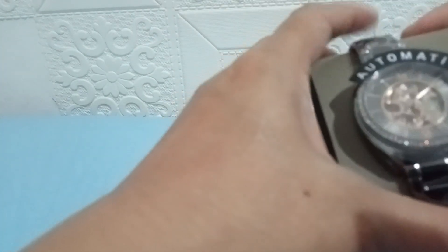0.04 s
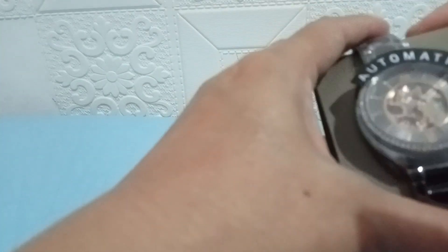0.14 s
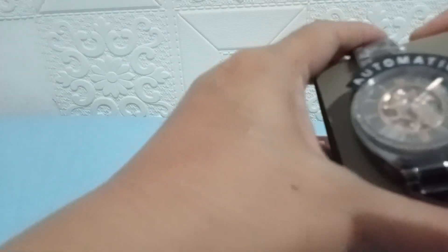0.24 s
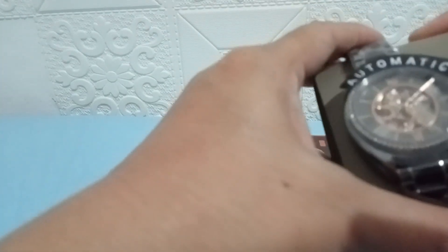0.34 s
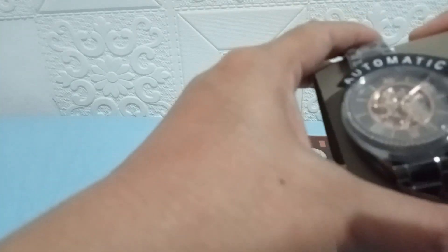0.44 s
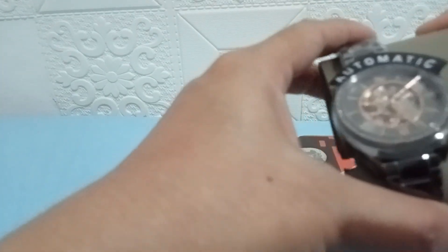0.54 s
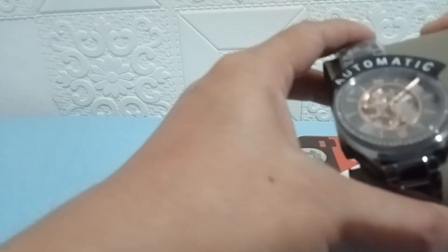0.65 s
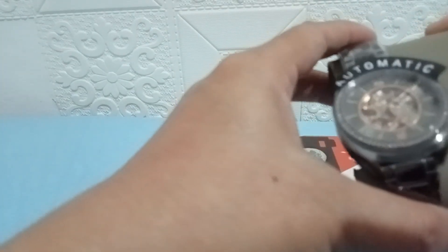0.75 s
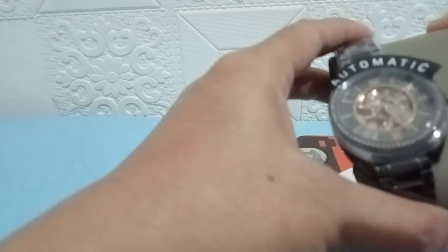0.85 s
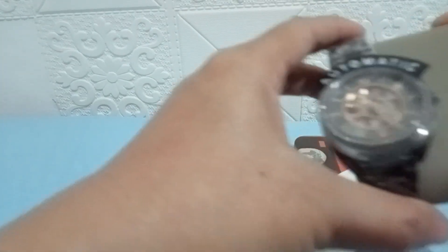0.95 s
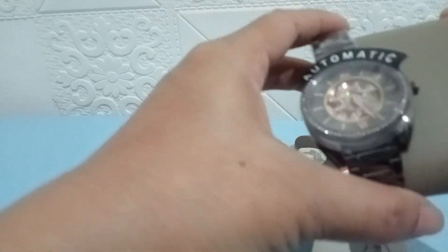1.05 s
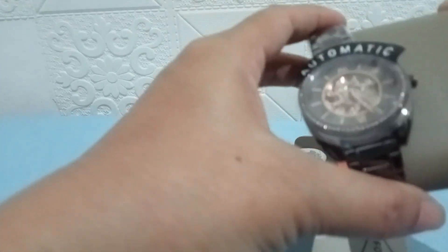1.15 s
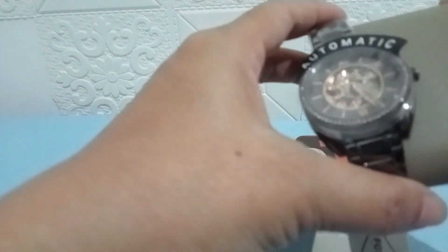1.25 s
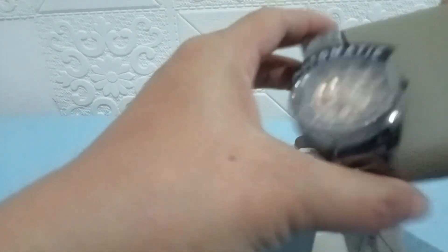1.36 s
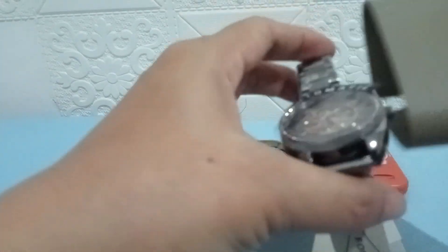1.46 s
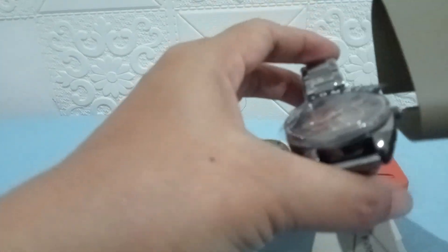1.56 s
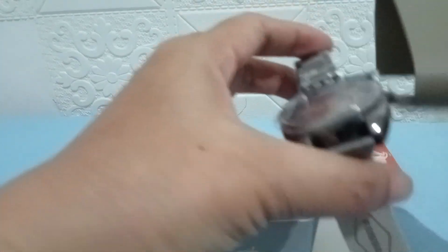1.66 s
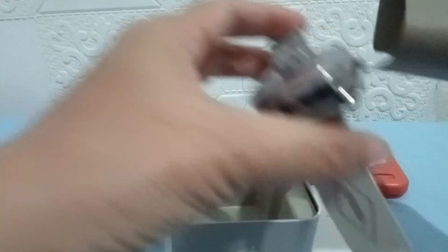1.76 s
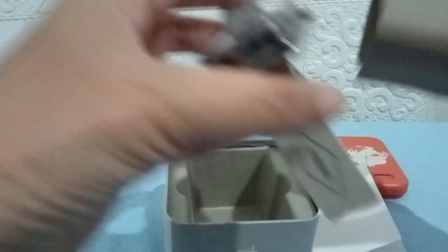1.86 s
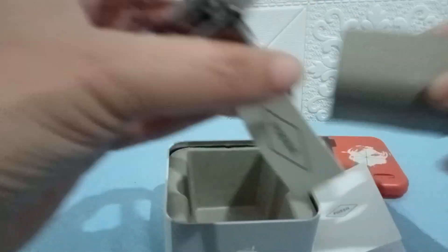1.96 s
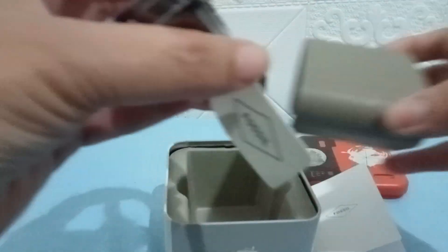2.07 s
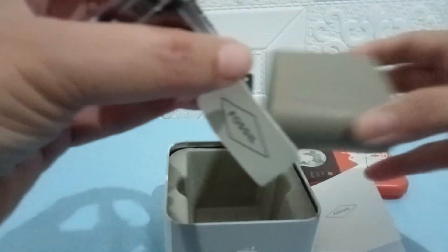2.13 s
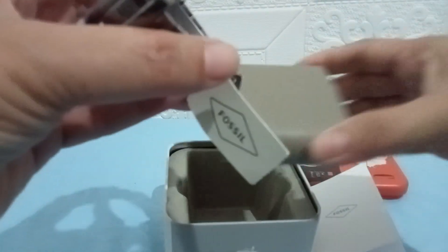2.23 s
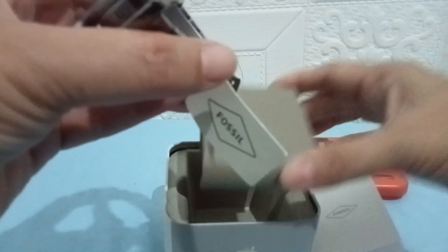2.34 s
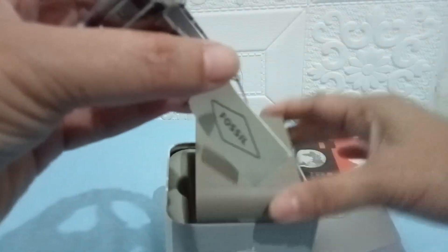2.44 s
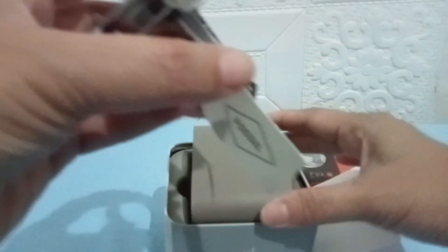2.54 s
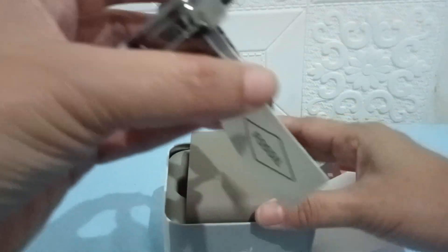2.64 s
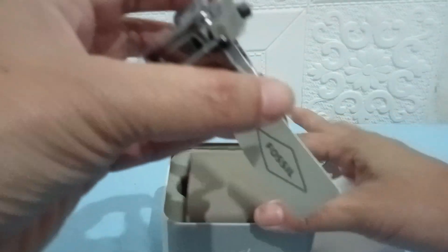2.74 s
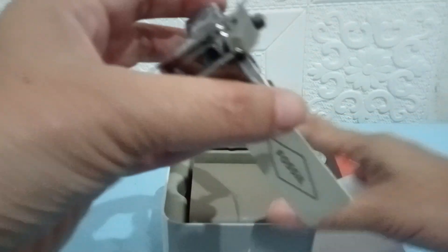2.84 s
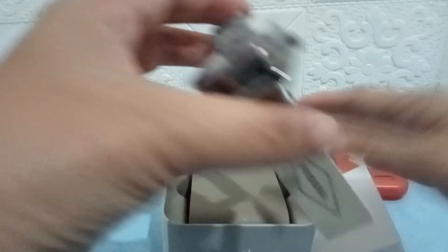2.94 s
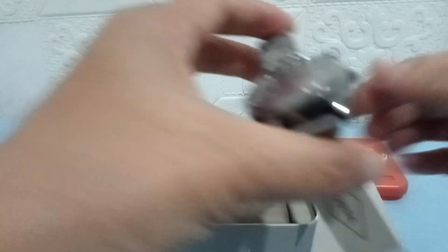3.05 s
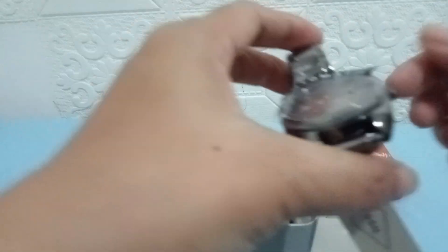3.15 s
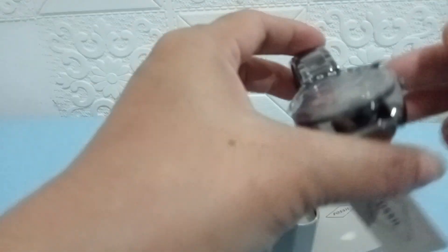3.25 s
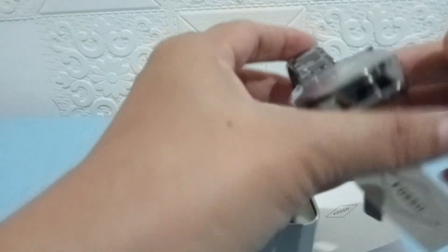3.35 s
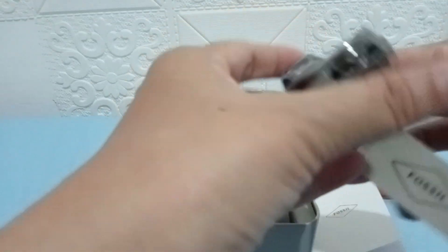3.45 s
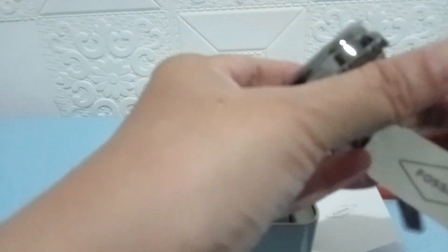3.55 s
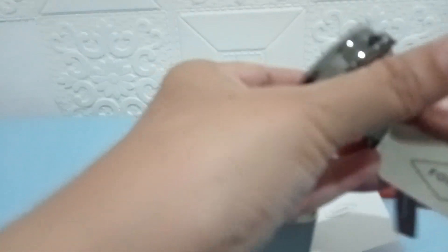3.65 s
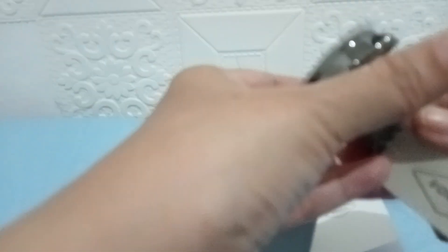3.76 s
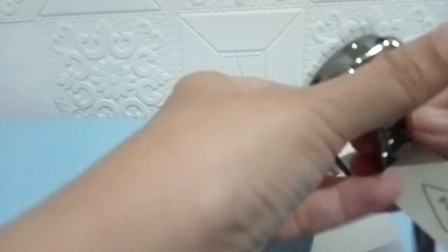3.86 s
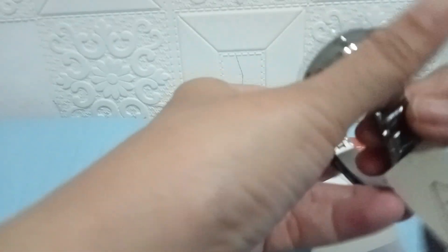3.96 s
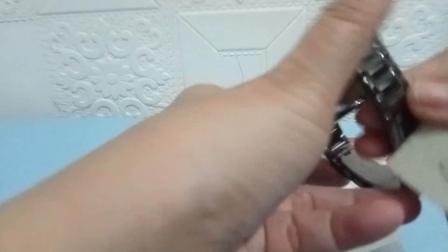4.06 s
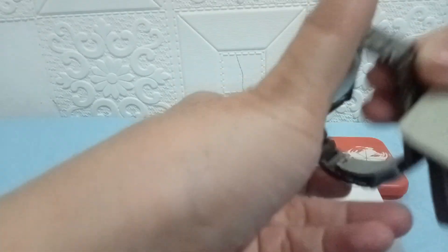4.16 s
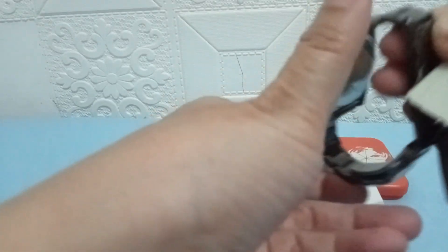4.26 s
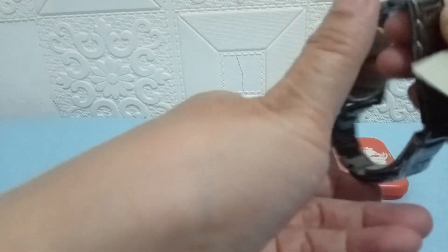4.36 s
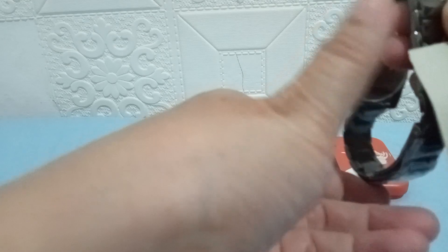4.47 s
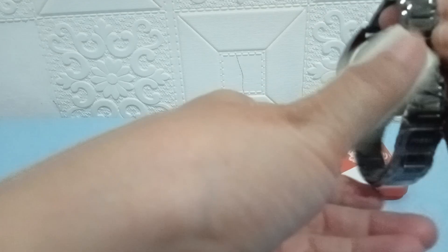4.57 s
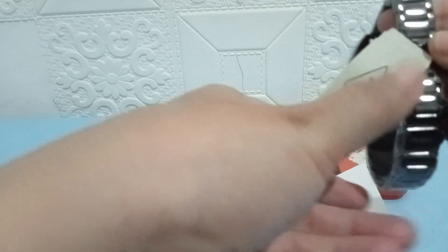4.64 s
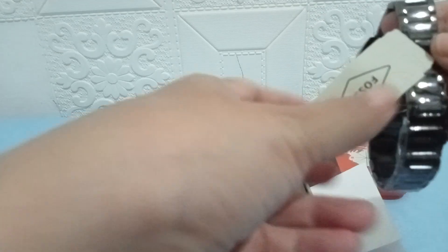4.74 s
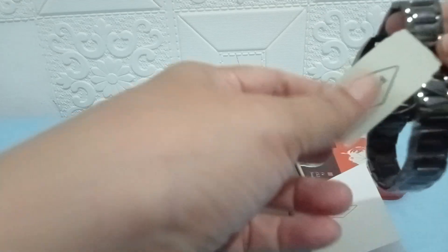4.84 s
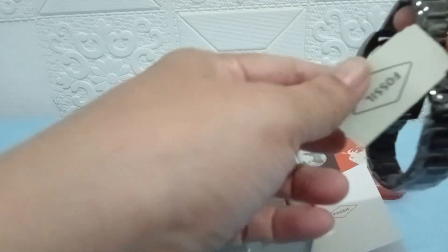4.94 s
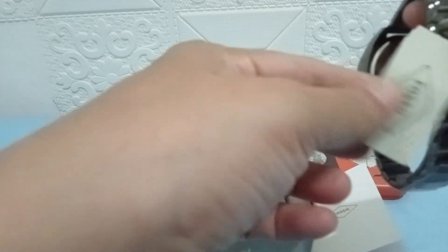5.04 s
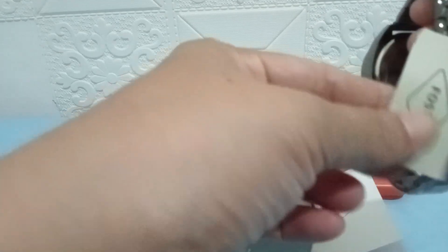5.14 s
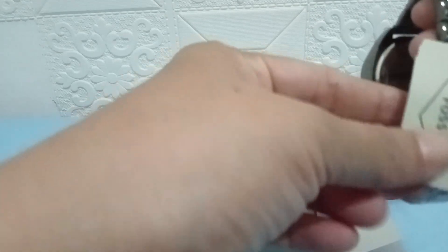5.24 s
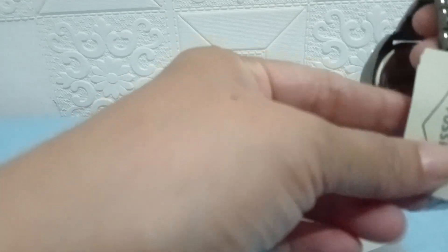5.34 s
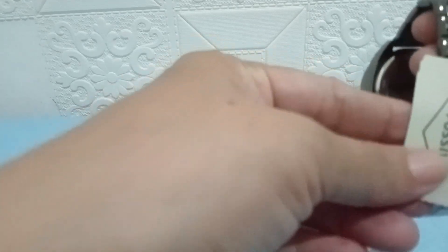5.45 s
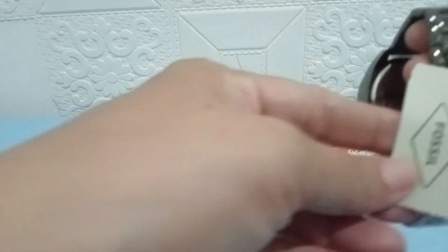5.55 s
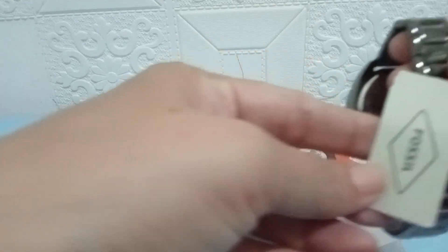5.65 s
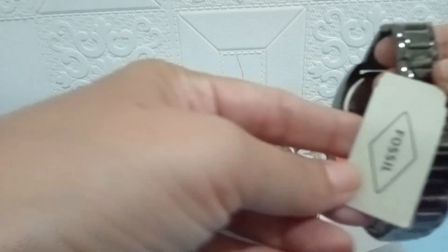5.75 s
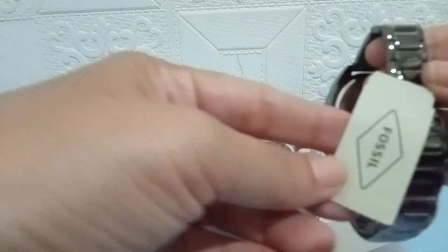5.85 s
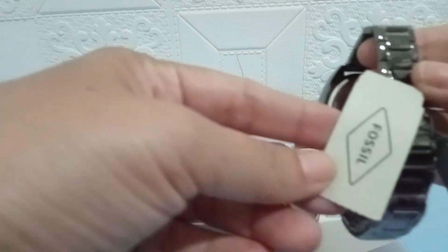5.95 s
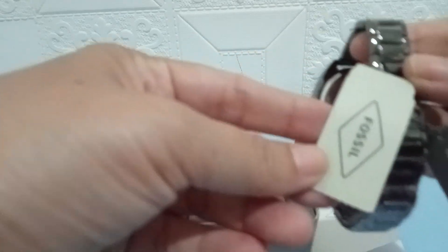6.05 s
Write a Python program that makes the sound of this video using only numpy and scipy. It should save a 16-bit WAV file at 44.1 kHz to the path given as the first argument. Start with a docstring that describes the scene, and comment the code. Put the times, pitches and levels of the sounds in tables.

```python
"""Small room, close microphone: a steel watch is slid off its cushion; the links rub, tick and clink.
Then the cushion is dropped and pushed back into its tin, whose damped modes ring under padded knocks.
Last the folding clasp snaps open and flips over: two hard blows on small resonant parts.
Throughout, fingers and a card tag brush the steel as filtered friction noise.
The hands rumble faintly over room air and a low steady hum."""
import sys
import numpy as np
from scipy import signal
from scipy.fft import rfft, irfft, next_fast_len
from scipy.io import wavfile

SR = 44100
rng = np.random.default_rng(int(sys.argv[2]) if len(sys.argv) > 2 else 0)


def file_out(sig):
    """Save sig as 16-bit WAV at sys.argv[1]."""
    # one column per channel
    cols = np.atleast_2d(sig).T
    # limit, then scale
    lim = np.clip(cols, -1, 1)
    pcm = np.round(lim * 32767).astype(np.int16)
    wavfile.write(sys.argv[1], SR, pcm)


N = 269043
TIME = np.arange(N) / SR


def from_db(db):
    """Decibels to gain."""
    return 10 ** (np.asarray(db) / 20)


def rms_one(x):
    """Scale to rms 1."""
    return x / np.sqrt(np.mean(x ** 2) + 1e-20)


def energy_one(x):
    """Scale to energy 1."""
    return x / np.sqrt(np.sum(x ** 2) + 1e-20)


def add(out, s, sound):
    """Mix a sound in at time s."""
    at = int(np.clip(s * SR, 0, N - 1))
    out[at:at + len(sound)] += sound[:N - at]


def coloured(x, spectrum):
    """Give a steady signal a spectrum of (Hz, dB) points; rms 1."""
    hz, db = np.transpose(spectrum)
    size = next_fast_len(N)
    freq = np.maximum(np.fft.rfftfreq(size, 1 / SR), 1)
    gain = from_db(np.interp(np.log(freq), np.log(hz), db, left=-90, right=-90))
    return rms_one(irfft(rfft(x, size) * gain, size)[:N])


def resonate(x, hz, width_hz):
    """One resonance with gain 1 on top."""
    r = np.exp(-np.pi * width_hz / SR)
    zeros = np.array([1, 0, -1]) * (1 - r * r) / 2
    poles = [1, -2 * r * np.cos(2 * np.pi * hz / SR), r * r]
    return signal.lfilter(zeros, poles, x + 1e-18)


def resonances(x, modes):
    """Parallel resonances of alternating sign."""
    return sum((-1) ** k * from_db(db) * resonate(x, hz, width) for k, (hz, width, db) in enumerate(modes))


def low_pass(x, hz):
    """Second-order low-pass."""
    return signal.sosfilt(signal.butter(2, hz, fs=SR, output="sos"), x)


def high_pass(x, hz):
    """Second-order high-pass."""
    return signal.sosfilt(signal.butter(2, hz, "high", fs=SR, output="sos"), x)


def ring(t, hz, t60):
    """A dying sine."""
    return np.sin(2 * np.pi * hz * t) * from_db(-60 * t / t60)


def contact(t, grind_s, rough):
    """A sharp touch followed by a brief grind of the two surfaces."""
    force = rough * energy_one(rng.standard_normal(len(t)) * np.exp(-t / grind_s))
    force[0] += 1
    return force


def friction(per_s, spread_db, smooth):
    """Tiny slips of uneven size on a smooth hiss."""
    happens = rng.random(N) < per_s / SR
    size_db = spread_db * np.minimum(rng.exponential(1, N), 4)
    slips = happens * rng.choice([-1, 1], N) * from_db(size_db)
    return rms_one(slips) + smooth * rng.standard_normal(N)


def drift(per_s):
    """A random wander of spread 1, turning per_s times a second."""
    knots = rng.standard_normal(2000)
    return rms_one(np.interp(TIME * per_s, np.arange(len(knots)), knots))


# a movement gains this much over its rise and loses it over its fall; roundness 1 = pointed, 2 = a bell
SWELL_DB, SWELL_ROUNDNESS = 10, 1.37


def strokes(rows, rest_db=-120):
    """Loudness of movements (fastest_s, rise_s, fall_s, level_db) that speed up and slow down over a rest."""
    t = TIME[::20]
    power = from_db(rest_db) ** 2
    for s, rise, fall, db in rows:
        away = np.maximum((s - t) / rise, (t - s) / fall)
        power = power + from_db(db - SWELL_DB * np.minimum(away, 20) ** SWELL_ROUNDNESS) ** 2
    return np.interp(TIME, t, np.sqrt(power))


# steel touching steel, before the room: start_s, level_db [over 1 ms], pitch_hz [of the touched part],
# body_db [share of the watch body against the part], grind_ms
STEEL_TICKS = [(.0030, -40, 9450, -8.5, 3.4), (.0360, -53, 9900, -13, 2.2), (.0590, -48.5, 10000, -24, 2.2),
               (.0635, -39, 9900, -36, 1.2), (0.1135, -52.5, 9600, -4, 2.4),
               (0.1497, -56.5, 9900, -16, 1.7), (0.1874, -44.5, 1830, -9, 2.3),
               (0.2135, -42.5, 12800, -14, 3), (0.22, -52, 9500, 16, 1.8), (0.232, -35, 12800, -8, 1.7),
               (0.2345, -39, 6550, -2.5, 1.3), (.2350, -42.5, 1210, -25, 1.65),
               (0.453, -57, 6850, -21, 1.9), (0.602, -53, 9450, -3, 2.7), (0.7428, -54.5, 6840, -4, 4.1),
               (0.7763, -32.5, 8100, -32, 1.2), (0.7770, -39.5, 13000, -28, 1.5),
               (0.8437, -55.5, 6100, -10, 2.2), (1.0604, -50.5, 9600, -4, 2.4),
               (1.2955, -64, 13000, -18, 1), (1.375, -42.5, 9970, -8, 4.1), (1.388, -34.5, 10500, -11, 1.1),
               (1.393, -33.5, 10600, -5, 2.9), (1.401, -44, 13500, -8, 1.2), (1.405, -39, 10500, -10, 1.1),
               (1.4110, -28, 14300, -3.5, 1.7), (1.4142, -29.5, 6200, -25, 4),
               (1.436, -32.5, 10400, -26, 1.5), (1.441, -39, 10100, -12, 1.6),
               (1.4680, -43.5, 10300, -13, 1), (1.5170, -46.5, 14500, -25, 0.67),
               (1.5400, -51, 11300, -16, .8), (1.7394, -52.5, 9200, -14, 2.2), (2.2034, -55, 3880, 15, 2.8),
               (2.219, -48.5, 10000, 12, 1.3), (2.809, -34, 4300, 9, 1.3), (2.878, -48, 10100, -10, 2.8),
               (3.195, -58.5, 10600, -10, 0.59), (3.2254, -51, 8000, -25, 1.3),
               (4.0733, -60.5, 10000, -7, 1.5), (4.173, -46, 10300, -16, 5.8),
               (4.2094, -40, 8700, -20, 4.7), (4.218, -47.5, 9400, -7.5, 1.1),
               (4.6033, -44, 7700, -2.5, 1.7)]
# one bracelet link damped by the fingers: pitch_hz, width_hz, relative level_db
LINK_MODES = [(5500, 780, -29.5), (7150, 1300, -13), (9600, 450, 7.5), (10430, 180, 3.5),
              (9680, 680, -10.5), (13200, 2400, -5), (14500, 1500, -20)]
# the whole watch damped by the fingers: pitch_hz, width_hz, relative level_db
BODY_MODES = [(667, 72, -4), (1110, 190, -6.5), (2037, 400, 8), (3190, 540, -2.5), (3940, 350, 0.5),
              (4300, 2100, 3), (4630, 1900, 5)]


def ticks(own_q=10, link_db=-1, crack_db=-9, rough_per_ms=1.5):
    """Each contact rings the touched part, the links and the body; the more body it has, the duller it is."""
    out, t = np.zeros(N), TIME[:SR // 40]
    for s, db, hz, body_db, grind_ms in STEEL_TICKS:
        force = contact(t, grind_ms / 1000, rough_per_ms * grind_ms)
        part = energy_one(resonate(force, hz, hz / own_q))
        links = from_db(link_db) * energy_one(resonances(force, LINK_MODES))
        # longer grinding adds a broad bright crack
        crack = from_db(crack_db) * grind_ms * energy_one(np.diff(force, prepend=0))
        body = from_db(body_db)
        tick = part + (links + crack) / (1 + 4.6 * body) + body * energy_one(resonances(force, BODY_MODES))
        add(out, s, from_db(db) * energy_one(tick) * np.sqrt(SR / 1000))
    return out


# a loose leaf of the clasp rings freely: start_s, pitch_hz, level_db [peak], t60_s
FREE_CLINKS = [(0.7417, 6820, -48.5, 0.025), (1.3855, 5380, -39.5, 0.051), (1.389, 3690, -34, 0.081),
               (1.3985, 3700, -50, .04), (1.4110, 3614, -35, 0.059), (1.41, 6740, -43, 0.1),
               (1.4169, 1700, -31, 0.023), (1.4181, 3550, -26, 0.053), (1.4380, 6770, -40.5, 0.083)]


def clinks():
    """Clear short tones of free steel, each a dying sine."""
    out = np.zeros(N)
    for s, hz, db, t60 in FREE_CLINKS:
        add(out, s, from_db(db) * ring(TIME[:SR // 4], hz, t60))
    return out


def loose_links(quietest_db=-79, range_db=10):
    """Slack links touch faintly at random times, each at a pitch of its own."""
    out, t = np.zeros(N), TIME[:SR // 100]
    for when, pitch, size in rng.random((24, 3)):
        hz = 5000 + 6000 * pitch
        tick = resonate(contact(t, grind_s=0.0017, rough=4.9), hz, hz / 2)
        peak = from_db(quietest_db + range_db * size)
        add(out, when * N / SR, peak * tick / np.abs(tick).max())
    return out


# the fingers move the watch over cloth, card and skin: fastest_s, rise_s, fall_s,
# sizzle_db [link edges], rasp_db [bracelet], brush_db [soft brushing]; each layer is trimmed where it plays
RUBS_OF_WATCH = [(.06, .13, 0.24, -71.5, -72, -69.5), (0.26, 0.057, 0.072, -62.5, -64.5, -65),
                 (.515, 0.045, 0.073, -64.5, -62, -69), (.59, 0.045, 0.032, -61, -56.5, -63),
                 (.795, 0.031, 0.045, -61.5, -64, -64.5), (0.984, 0.029, 0.073, -53.5, -55, -60.5),
                 (1.41, 0.03, 0.031, -49.5, -45.5, -54.5), (1.47, .06, 0.17, -69.5, -68, -66.5),
                 (1.74, .014, 0.058, -69.5, -57, -60), (1.97, 0.21, 0.14, -66, -70.5, -67),
                 (2.063, 0.031, 0.052, -78, -59.5, -57), (2.217, 0.024, 0.017, -59, -59.5, -57.5),
                 (2.275, 0.05, 0.038, -70, -72, -75), (2.34, 0.035, 0.038, -66, -76, -63),
                 (2.49, 0.023, 0.14, -60.5, -54.5, -58), (2.75, .1, .06, -61.5, -62, -71),
                 (2.805, 0.041, 0.029, -53, -43, -65), (2.885, .04, 0.068, -61, -66, -65),
                 (3.151, 0.12, 0.11, -78, -89, -88), (3.255, 0.064, 0.16, -70.5, -83, -74.5),
                 (3.84, .025, 0.043, -71, -81, -89), (3.96, 0.018, 0.034, -69, -79, -91),
                 (4.25, 0.073, 0.13, -63.5, -68, -67.5), (4.45, .06, .06, -75, -66.5, -74),
                 (4.64, 0.21, 0.24, -66, -66, -65.5), (4.92, 0.12, 0.1, -62, -63, -60.5),
                 (5.22, 0.22, .27, -73, -71, -81), (5.69, 0.028, 0.092, -71.5, -78, -84)]
# bright spectrum of the link edges: pitch_hz, relative level_db
SIZZLE_SPECTRUM = [(2940, -69), (5000, -6.5), (5300, -8.5), (5900, -3), (6930, -2), (7790, -5),
                   (10300, 6.5), (11500, -6.5), (14700, -7.5), (16000, -25)]
# lower spectrum of the bracelet: pitch_hz, relative level_db
RASP_SPECTRUM = [(590, -48.5), (1000, -7), (1420, -0.5), (2170, 5), (2550, -1), (3830, 0.5), (4290, 4),
                 (7000, -16), (9100, -31.5), (15400, -120)]
# the closed loop of the bracelet: pitch_hz, width_hz, relative level_db
LOOP_MODES = [(1630, 180, -12.5), (2220, 180, 10.5), (3090, 45, 8.5), (3205, 82, -2), (3680, 79, 2),
              (4410, 210, -4.5), (5250, 68, -4.5)]
# the fingers never rest completely; levels before the trims
HOLD_SIZZLE_DB, HOLD_RASP_DB, HOLD_BRUSH_DB = -87.5, -78, -78


def sliding(sizzle_db=-1.5, rasp_db=-3, loop_db=-4, chain_db=-2):
    """Friction makes the link edges sizzle and the bracelet rasp; the grip trembles a little."""
    sizzle = strokes([(s, rise, fall, db) for s, rise, fall, db, _, _ in RUBS_OF_WATCH], HOLD_SIZZLE_DB)
    rasp = strokes([(s, rise, fall, db) for s, rise, fall, _, db, _ in RUBS_OF_WATCH], HOLD_RASP_DB)
    slips = friction(per_s=1400, spread_db=3.8, smooth=.8) * from_db(drift(120))
    # every slip also rings the chain's many small damped modes, which change as it bends
    bend = np.array([drift(8) for _ in range(4)])
    shares = bend / np.linalg.norm(bend, axis=0)
    t = TIME[:SR // 40]
    chains = [energy_one(rng.standard_normal(len(t)) * np.exp(-t / .0035)) for _ in bend]
    rung = sum(share * signal.fftconvolve(slips, chain)[:N] for share, chain in zip(shares, chains))
    slips = slips + from_db(chain_db) * rung
    low = coloured(slips, RASP_SPECTRUM) + from_db(loop_db) * rms_one(resonances(slips, LOOP_MODES))
    edges = from_db(sizzle_db) * sizzle * coloured(slips, SIZZLE_SPECTRUM)
    return edges + from_db(rasp_db) * rasp * rms_one(low)


# skin and cloth catch on the steel and sing briefly: start_s, length_s, pitch_hz,
# width_hz [before slight narrowing], level_db [rms, before the trim]
SINGING_SCUFFS = [(0.475, 0.155, 3716, 60, -67.5), (0.963, 0.057, 3740, 250, -59.5),
                  (0.964, 0.12, 2100, 350, -67.5), (0.976, 0.028, 5370, 200, -64),
                  (1.87, 0.064, 2860, 700, -70.5), (1.922, 0.11, 1980, 800, -67),
                  (2.194, 0.039, 2710, 200, -66), (2.635, 0.17, 830, 130, -65),
                  (2.786, 0.039, 3185, 129, -52), (2.783, 0.021, 4170, 250, -52),
                  (4.766, 0.07, 1870, 603, -69), (5.104, 0.19, 4200, 900, -75.5)]


def scuffs(trim_db=-1):
    """Short swells of stick-slip, each through one resonance applied twice."""
    out, slips = np.zeros(N), friction(per_s=1400, spread_db=0.5, smooth=0.75)
    for s, length, hz, width, db in SINGING_SCUFFS:
        at, size = int(s * SR), int(length * SR)
        tone = resonate(resonate(slips[at:at + size], hz, 0.96 * width), hz, 0.96 * width)
        add(out, s, from_db(db + trim_db) * rms_one(tone * signal.windows.tukey(size, .6)))
    return out


# the catch lets go: start_s, level_db [over 1 ms]
CATCH_RELEASES = [(4.2430, -15)]
# the clasp's spring catch: pitch_hz, width_hz, relative level_db
CATCH_MODES = [(5400, 2100, -19), (7520, 320, -9), (9060, 450, -4), (9700, 350, 2.5), (10290, 560, -1.5),
               (11960, 4700, -16.5), (14600, 300, -12)]
# the leaf hits its stop and bounces: start_s, level_db [over 1 ms]
LEAF_BLOWS = [(4.4720, -27), (4.4763, -30)]
# the clasp's folding leaf: pitch_hz, width_hz, relative level_db
LEAF_MODES = [(640, 180, -11.5), (1300, 104, -5), (1870, 540, -9.5), (3020, 320, -4), (3630, 360, -3.5),
              (4350, 680, -3.5), (5200, 380, 1), (6170, 1300, -12.5), (9400, 1200, -13), (10500, 440, -25),
              (14000, 4000, -37)]


def clasp(hits, modes, lowest_hz, rattle):
    """A hard, clean blow on one part of the clasp, with a slight rattle of the hinge."""
    out, t = np.zeros(N), TIME[:SR // 40]
    for s, db in hits:
        force = contact(t, .0015, rattle)
        part = energy_one(high_pass(resonances(force, modes), lowest_hz))
        add(out, s, from_db(db) * part * np.sqrt(SR / 1000))
    return out


# the lined tin: pitch_hz, relative level_db, t60_s
TIN_MODES = [(103, -27, 0.29), (167.3, -7, 0.095), (248, -24, 0.071), (293, -11, 0.036), (375, -22, 0.15),
             (456, -13, 0.07), (528, 1.5, 0.091), (603, 0.5, 0.079), (795, 7, 0.075), (870, -5, 0.076),
             (1005, -2, 0.074), (1171, -5.5, 0.048), (1340, 7.5, 0.026), (1430, -8, 0.07),
             (1746, -3.5, 0.084), (1800, -1, 0.012), (2028, -1, 0.033), (2350, -7, 0.028),
             (3100, -13, 0.036), (3880, -5, .03), (4420, 3.5, 0.034)]


def tin(t, uneven_db=2):
    """The tin's ring after a unit blow; every spot rings the modes with other strengths."""
    total = 0
    for hz, db, t60 in TIN_MODES:
        strength = from_db(db + uneven_db * rng.standard_normal()) * rng.choice([-1, 1])
        total = total + strength * ring(t, hz, t60)
    return energy_one(total)


# the cushion knocks in its tin: start_s, level_db [over 10 ms, before the bass cut],
# soft_hz [softness as a cut-off], pitch_hz [of the struck wall]
CUSHION_KNOCKS = [(2.4716, -48.5, 2520, 1340), (2.4970, -35, 1340, 362), (2.501, -41, 1920, 577),
                  (2.5086, -41, 1400, 995), (2.518, -43.5, 1000, 360), (2.5270, -53, 1400, 866),
                  (2.5960, -52, 1500, 830), (2.628, -48, 1200, 892), (2.7900, -41.5, 3520, 815),
                  (2.8076, -36.5, 1790, 559), (2.8150, -41, 1420, 552), (2.8280, -42.5, 705, 740),
                  (2.8575, -42, 900, 595)]
# the cushion slides down the wall of the tin: fastest_s, rise_s, fall_s, level_db [before the scrape trim]
CUSHION_PUSHES = [(2.515, 0.039, 0.11, -42), (2.815, 0.092, 0.08, -45.5)]
# it skids on after each knock; the level is against the knock, before the scrape trim
SKID_RISE_S, SKID_FALL_S, SKID_DB = 0.004, 0.0098, 2.5


def cushion(wall_db=-4, wall_t60=0.071, scrape_db=-7, lowest_hz=85):
    """The cushion's padded knocks ring the tin, most of all the struck wall, and it scrapes in between."""
    t = TIME[:SR // 4]
    slips = low_pass(friction(per_s=500, spread_db=4.5, smooth=0.35), 1900)
    skids = [(s + SKID_RISE_S, SKID_RISE_S, SKID_FALL_S, db + SKID_DB) for s, db, _, _ in CUSHION_KNOCKS]
    scrape = rms_one(signal.fftconvolve(slips, tin(t))[:N])
    out = from_db(scrape_db) * strokes(CUSHION_PUSHES + skids) * scrape
    for s, db, soft_hz, hz in CUSHION_KNOCKS:
        shell = tin(t) + from_db(wall_db) * energy_one(ring(t, hz, wall_t60))
        force = low_pass(contact(t, grind_s=0.0033, rough=0.31), soft_hz)
        knock = energy_one(signal.fftconvolve(force, shell)[:len(t)])
        add(out, s, from_db(db) * knock * np.sqrt(SR / 100))
    # the knocks have no deep bass
    return high_pass(out, lowest_hz)


# soft brushing of cushion and card: pitch_hz, relative level_db
BRUSH_SPECTRUM = [(150, -22), (250, -1), (457, -8), (534, -7.5), (644, -6), (853, -5.5), (1050, -6),
                  (1350, -10.5), (3000, -49), (3900, -54.5), (6600, -120)]
# the hands shift their grip: fastest_s, rise_s, fall_s, rumble_db [before the trim]
GRIP_SHIFTS = [(.42, 0.2, 0.1, -54), (.6, 0.089, 0.22, -51.5), (.83, 0.05, 0.061, -49.5),
               (.99, 0.043, 0.17, -56.5), (1.39, .045, .35, -60.5), (1.78, 0.13, 0.24, -58),
               (2.51, 0.036, .047, -53), (2.84, 0.12, 0.18, -55.5), (3.45, .05, .12, -61),
               (4.25, 0.035, 0.13, -57), (4.52, .07, 0.35, -60)]
# moving hands: pitch_hz, relative level_db
RUMBLE_SPECTRUM = [(18, -49.5), (30, -30.5), (54, -7), (92, 2.5), (110, -2.5), (172, -20.5), (259, -26),
                   (305, -19.5), (400, -26), (520, -59.5), (880, -120)]
HOLD_RUMBLE_DB = -67.5   # between shifts, before the trim


def handling(brush_db=-3, rumble_db=-1):
    """Soft brushing of cushion and card as friction noise, and the low noise of moving hands."""
    loudness = strokes([(s, rise, fall, db) for s, rise, fall, _, _, db in RUBS_OF_WATCH], HOLD_BRUSH_DB)
    brush = loudness * coloured(friction(per_s=900, spread_db=2.5, smooth=0.95), BRUSH_SPECTRUM)
    rumble = strokes(GRIP_SHIFTS, HOLD_RUMBLE_DB) * coloured(rng.standard_normal(N), RUMBLE_SPECTRUM)
    return from_db(brush_db) * brush + from_db(rumble_db) * rumble


# reflections off table and walls: delay_s, level_db
NEAR_ECHOES = [(.0018, -16.5), (0.0127, -21.5), (.0190, -35), (0.019, -45.5), (.0232, -33.5), (.0345, -26)]


def room(x, tail_db=-24, t60=0.13, first_wall_s=0.014, top_db=3):
    """A few near reflections, then a short diffuse tail that is strongest in the top."""
    t = TIME[:SR // 2]
    tail = from_db(tail_db) * energy_one(rng.standard_normal(len(t)) * from_db(-60 * t / t60) * (t > first_wall_s))
    response = tail + from_db(top_db) * resonate(tail, 9500, 3000)
    for s, db in NEAR_ECHOES:
        add(response, s, from_db([db]))
    return x + signal.fftconvolve(x, response)[:N]


# still room air: pitch_hz, relative level_db
AIR_SPECTRUM = [(18, -50), (30, -22), (70, -2), (95, -6), (157, 2.5), (204, -10), (303, -6), (404, -13),
                (600, -17), (4300, -25.5), (7870, -33), (9710, -28.5), (11700, -35.5), (14800, -34.5),
                (16000, -41.5)]
AIR_DB = -68   # rms
HUM_HZ, HUM_DB = 306.5, -79   # level as rms


def background():
    """Still room air as steady noise, and a faint appliance hum as one sine."""
    hum = from_db(HUM_DB) * np.sqrt(2) * np.sin(2 * np.pi * HUM_HZ * TIME)
    return from_db(AIR_DB) * coloured(rng.standard_normal(N), AIR_SPECTRUM) + hum


def scene():
    """Watch, tin and hands close to the microphone; the clinks stay dry."""
    catch = clasp(CATCH_RELEASES, CATCH_MODES, lowest_hz=498, rattle=0.37)
    leaf = clasp(LEAF_BLOWS, LEAF_MODES, lowest_hz=300, rattle=.3)
    watch = ticks() + loose_links() + catch + leaf + sliding() + scuffs()
    return (room(watch + cushion()) + clinks() + handling() + background())[None]


def record(dry, cutoff_hz=15800):
    """The top is cut steeply."""
    return signal.sosfilt(signal.ellip(10, .2, 70, cutoff_hz, fs=SR, output="sos"), dry)


dry = scene()
out = record(dry)
file_out(out)
```